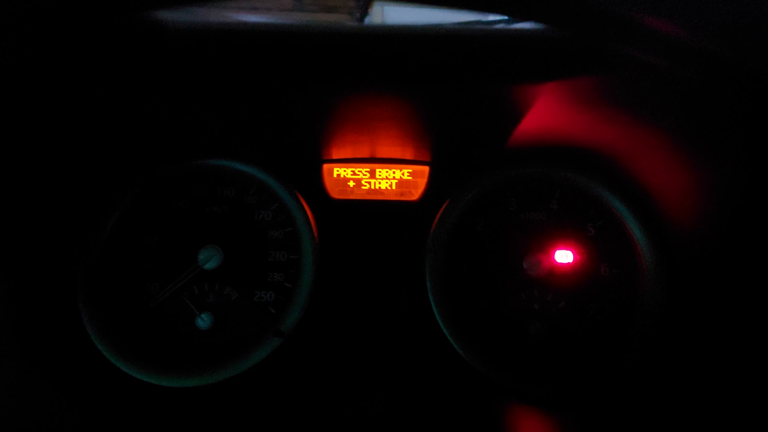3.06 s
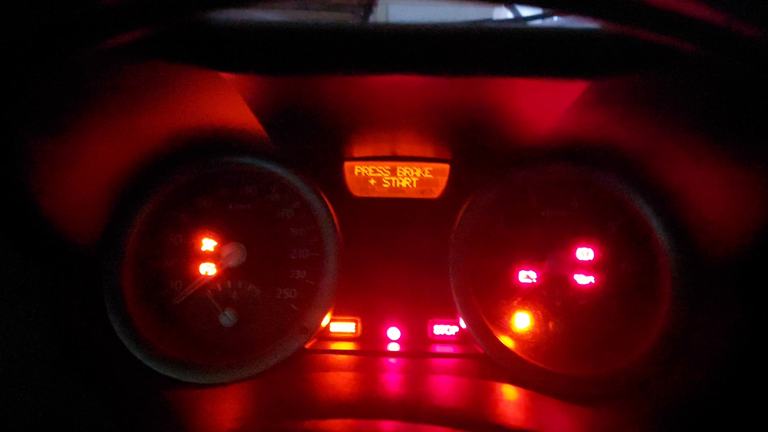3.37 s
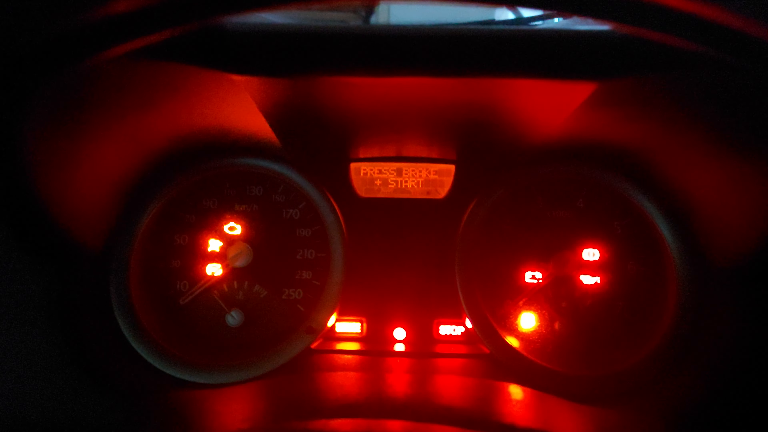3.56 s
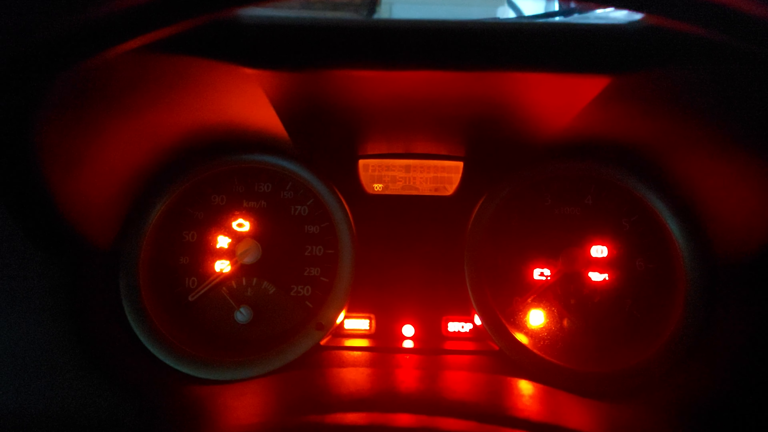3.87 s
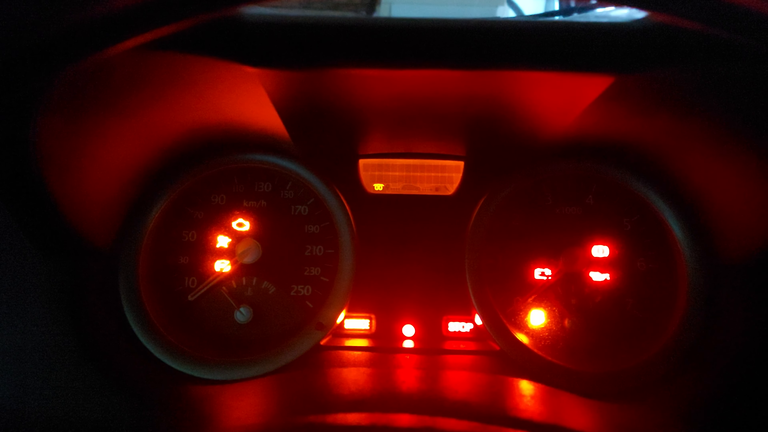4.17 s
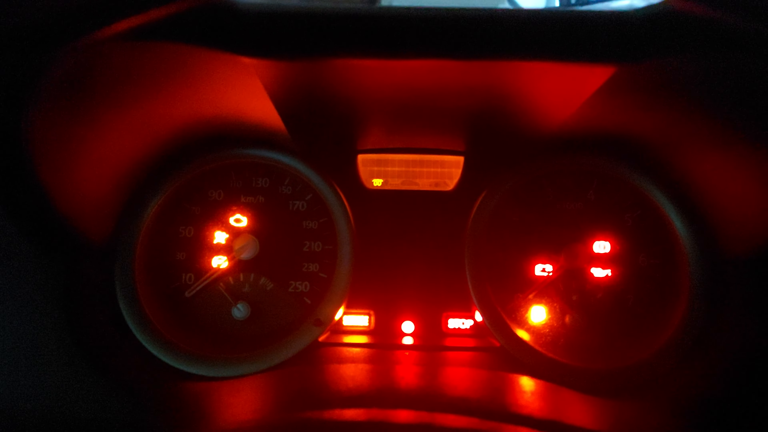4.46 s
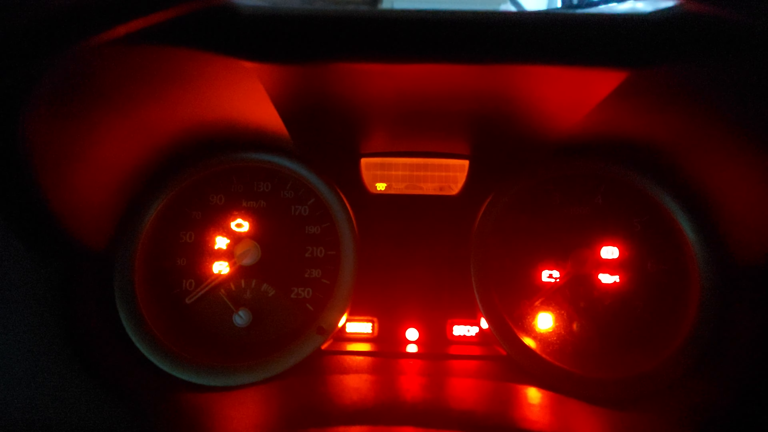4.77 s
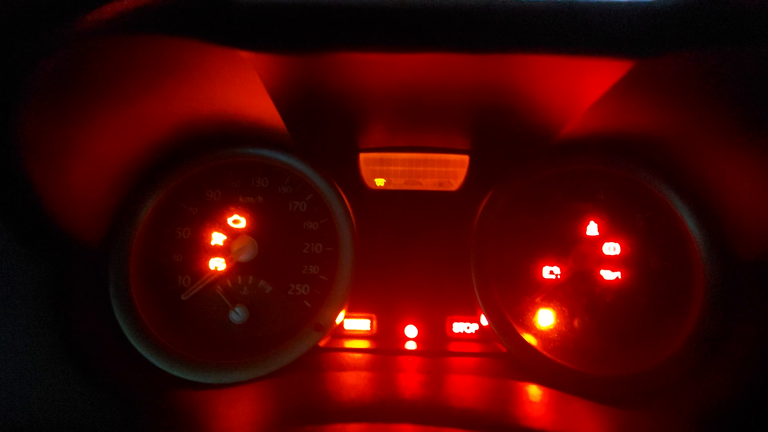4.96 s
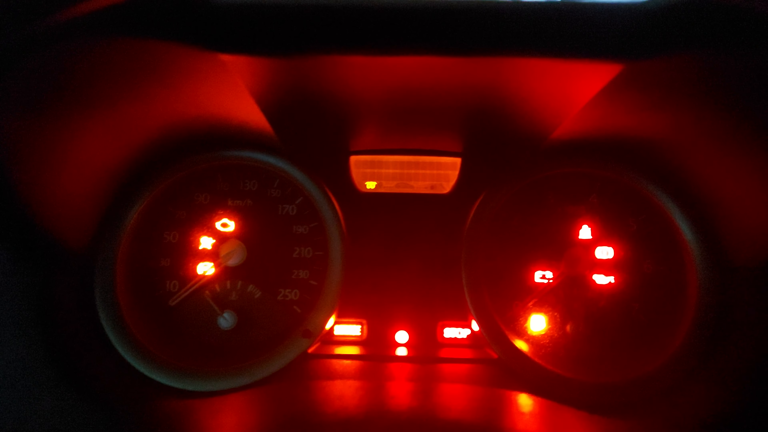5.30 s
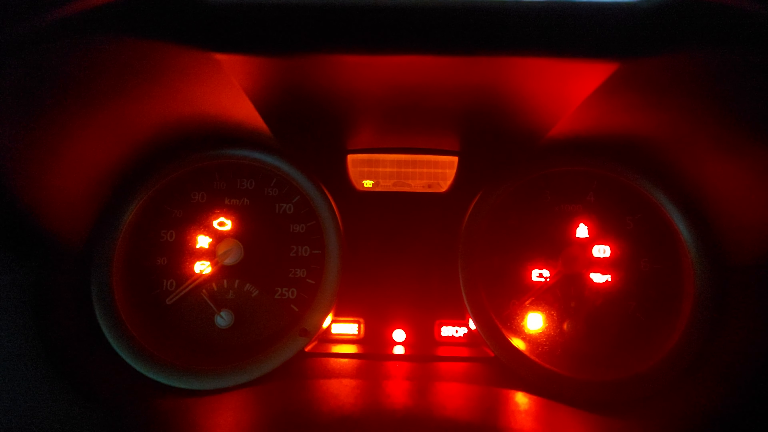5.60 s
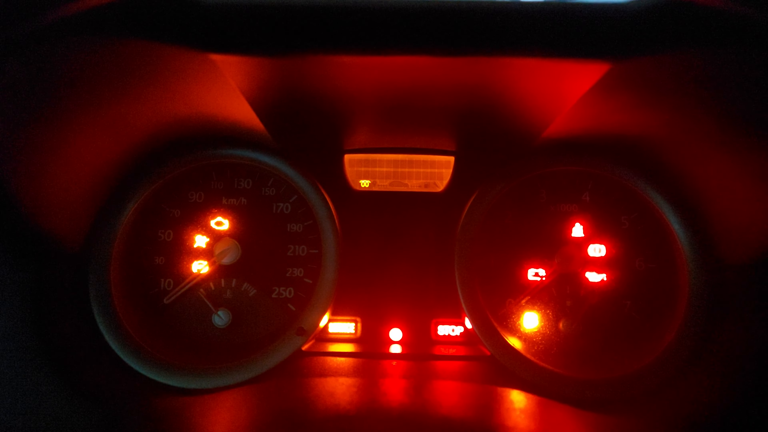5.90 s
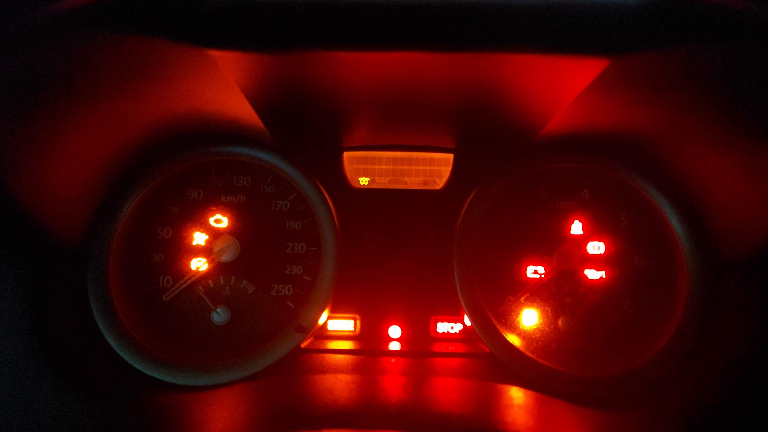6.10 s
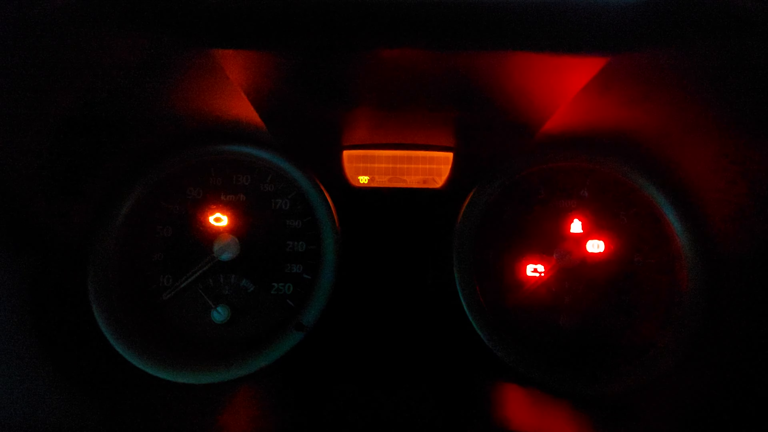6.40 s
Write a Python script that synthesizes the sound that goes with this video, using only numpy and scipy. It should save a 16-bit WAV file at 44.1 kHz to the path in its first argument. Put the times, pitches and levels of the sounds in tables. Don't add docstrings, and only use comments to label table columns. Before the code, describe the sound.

For the first second a driver shifts, with rustling fabric, cushion rumble and little creaks. A strong dull pedal blow follows, then sparse trim clicks. Just after three seconds a stiff button squeaks and snaps, the sharpest sound. Relays click, a faint pump starts, gauges tick finely, and low exhaust passes outside. Heard close up inside a closed, quiet car with light microphone hiss.

```python
import sys
import numpy as np
from scipy import signal
from scipy.fft import irfft, next_fast_len
from scipy.io import wavfile
from scipy.ndimage import uniform_filter1d

SR = 44100
rng = np.random.default_rng(int(sys.argv[2]) if len(sys.argv) > 2 else 0)


def master(y):
    cut = np.clip(np.atleast_2d(y).T, -1, 1)
    pcm = np.round(cut * 32767)
    wavfile.write(sys.argv[1], SR, pcm.astype(np.int16))


def voltage_ratio(level):
    return 10 ** (np.asarray(level, float) / 20)


N = 288414
T = np.arange(N) / SR

# (t/s,
# held/s, fibre hiss level/dB, rubbing level/dB, left-right/dB)
CLOTH_STROKES = [(0.031, 0.048, -59.5, -58.5, 7.5), (0.272, 0.088, -51.5, -55.5, 5.5),
                 (0.397, .15, -56.5, -54.5, 3.5), (0.575, 0.012, -59.5, -49, 6), (.62, 0.15, -67, -57, 6.5),
                 (0.772, 0.047, -64.5, -52.5, 5.5), (1.11, .005, -63.5, -71, 0),
                 (2.677, 0.042, -67.5, -68.5, -1), (2.76, 0.029, -85, -81, 6),
                 (3.21, 0.0022, -63.5, -48.5, -5), (3.27, 0.0061, -65, -60, -12.5),
                 (3.345, 0.0049, -72.5, -58.5, 16), (3.408, 0.15, -63.5, -61.5, -2),
                 (3.618, 0.097, -85, -73.5, 6.5), (3.925, 0.056, -89.5, -70, 6.5)]
CLOTH_RISE_S, CLOTH_FALL_S = 0.24, 0.13
# (f/Hz, level/dB per Hz)
GEAR_SPECTRUM = [(3300, -10.5), (4300, -1), (5800, -14), (7200, -2.5), (9500, -8), (11500, -0.5),
                 (13500, -9.5), (14500, -20.5)]
PEDAL_S = 1.5


def rms_one(x):
    return x / np.sqrt(np.mean(x ** 2) + 1e-20)


def peak_one(x):
    return x / np.max(np.abs(x))


def in_time(rows):
    s, *columns = np.transpose(rows)
    return [np.interp(T, s, c) for c in columns]


def at_hz(points, hz):
    f, level = np.transpose(points)
    return np.interp(np.log(hz), np.log(f), level)


def drift(rate):
    r = np.exp(-80 * np.pi * rate / SR)
    slow = signal.lfilter([1], [1, -2 * r, r * r], rng.standard_normal(N // 40 + 2002))[2000:]
    return np.interp(np.arange(N) / 40, np.arange(len(slow)), rms_one(slow))


def sides(db):
    return voltage_ratio(np.clip(np.array([db / 2, -db / 2]), -15, 15)).reshape(2, -1)


def coloured(spectrum, alike=None):
    # (f/Hz, left-right likeness)
    likeness = [(60, -0.51), (180, 0.77), (550, 0.33), (1650, -0.044), (4970, -0.85), (15000, -0.03)]
    size = next_fast_len(N)
    hz = np.maximum(np.fft.rfftfreq(size, 1 / SR), 1)
    c = np.clip(at_hz(likeness, hz) if alike is None else alike, 0, 1)
    phase = np.exp(2j * np.pi * rng.random((2, len(hz))))
    mid, side = rng.standard_normal((2, len(hz))) * phase
    both = np.sqrt(1 + c) * mid + np.sqrt(1 - c) * side * [[1], [-1]]
    inside = (hz >= spectrum[0][0]) & (hz <= spectrum[-1][0])
    return rms_one(irfft(both * voltage_ratio(at_hz(spectrum, hz)) * inside, size)[:, :N])


def band(x, low_hz, high_hz, order=2):
    return signal.sosfilt(signal.butter(order, [low_hz, high_hz], "band", fs=SR, output="sos"), x)


def resonate(x, hz, width_hz):
    r = np.exp(-np.pi * width_hz / SR)
    g = (1 - r * r) / 2
    return signal.lfilter([g, 0, -g], [1, -2 * r * np.cos(2 * np.pi * hz / SR), r * r], x)


def add(out, s, piece):
    i = round(s * SR)
    out[:, i:i + piece.shape[-1]] += piece[..., :N - i]


def packet(hz, swell_s):
    t = T[:SR // 20]
    return peak_one((t / swell_s) ** 2 * np.exp(-t / swell_s) * np.sin(2 * np.pi * hz * t))


def left_late(x):
    return np.array([np.roll(x[0], 21), x[1]])


def strokes(rows, column, rise_s, fall_s):
    s, held, db = (np.array(rows)[:, [c]] for c in (0, 1, column))
    t = T[::44]
    before, after = np.maximum(s - t, 0), np.maximum(t - s - held, 0)
    each = db - 60 * (before / rise_s + after / fall_s)
    total_db = 10 * np.log10(np.sum(10 ** (each / 10), axis=0) + 1e-14)
    return np.interp(T, t, total_db), np.repeat(each.argmax(axis=0), 44)[:N]


def struck(t):
    direct = 0.7 * np.exp(-t / .002)
    held = np.exp(-(t / 0.019) ** 2)
    tail = 0.046 * voltage_ratio(-60 * t / 0.13)
    return np.minimum(t / 0.0006, 1) * (direct + held + tail)


def half_shared(t):
    return rng.standard_normal(len(t)) + .5 * rng.standard_normal((2, len(t)))


def panel(t):
    # (f/Hz, width/Hz, level/dB)
    modes = [(1720, 200, 0.5), (2117, 570, -1)]
    shake = half_shared(t)
    ring = sum(voltage_ratio(db) * resonate(shake, hz, width_hz) for hz, width_hz, db in modes)
    return peak_one(band(ring, 1190, 2216, order=4) * struck(t))


def narrowed(snap, s, order):
    # (t/s, low f/Hz, high f/Hz)
    narrow = [(1.369, 2100, 8900), (2.098, 4800, 15500), (4.564, 6100, 14200), (3.892, 3000, 7400),
              (5.689, 7700, 15000)]
    for at, low_hz, high_hz in narrow:
        if abs(at - s) < 1 / 100:
            snap = band(snap, low_hz, high_hz, order=order)
    return snap


def friction(hiss, rows):
    spectrum = [(600, -27), (1000, -13.5), (1900, -7.5), (2500, -16.0), (3500, -21.0)]
    body, grain, out = coloured(spectrum, alike=0.038), voltage_ratio(1.1 * drift(98)), np.zeros((2, N))
    for s, length, body_db, hiss_db, pan_db in rows:
        at = slice(round(s * SR), round((s + length + 0.18) * SR))
        t = T[at] - s
        stroke = np.minimum(t / 0.0075, 1) * voltage_ratio(-60 * np.maximum(t - length, 0) / 0.066) * grain[at]
        out[:, at] += stroke * (voltage_ratio(body_db) * body[:, at] + voltage_ratio(hiss_db) * hiss[:, at]) * sides(pan_db)
    return out


def seat():
    # (t/s, held/s, cushion level/dB, creak level/dB)
    shifts = [(0, 0.17, -53.5, -63), (.24, 0.13, -40, -51.5), (.45, 0.039, -37.5, -47),
              (.52, 0.1, -40, -48.5), (.74, 0.08, -35.5, -43.5), (.94, 0.0039, -55, -63.5),
              (1.02, .13, -40, -56.5), (1.75, 0.016, -38.5, -52), (3.42, 0.08, -73, -62),
              (3.64, .08, -63, -63)]
    # (t/s, held/s, cushion level/dB, creak level/dB)
    jolts = [(1.6, 0.0042, -24.5, -40.5), (1.646, 0.033, -36.5, -53.5), (2.325, 0.003, -58, -44.5),
             (2.44, .02, -62, -57.5), (2.665, 0.023, -62, -55.5), (2.995, .005, -37, -41.5),
             (3.055, .005, -39, -63), (3.213, .003, -40, -41.5), (3.26, 0.024, -62, -46),
             (3.58, 0.0054, -64.5, -55)]
    creak_haste = 1.6
    kinds = [(shifts, 0.22, 0.39), (jolts, 0.037, 0.25)]
    cushion_db = np.maximum(*[strokes(rows, 2, rise, fall)[0] for rows, rise, fall in kinds])
    creak_db = np.maximum(*[strokes(rows, 3, rise, fall / creak_haste)[0] for rows, rise, fall in kinds])
    foam = coloured([(55, -11.5), (90, 3.0), (140, -2.0), (220, -7.5)], alike=0.8)
    frame = coloured([(190, -3.5), (300, 2.5), (600, -4.0), (800, -13.0), (1400, -33.5)], alike=.6)
    out = voltage_ratio(cushion_db - 6.0 + 1.7 * drift(8.1)) * foam * sides(0.92)
    return out + voltage_ratio(creak_db - 3.5 + 1.5 * drift(37)) * frame * sides(2.86)


def still_cabin():
    # (t/s, level above rest/dB)
    stir = [(0, 15), (.29, 19), (.42, 21), (.75, 12.5), (1.2, 1.5), (1.69, 7.5), (2.0, 4.5), (2.48, 8),
            (3.11, 3), (3.19, -1), (3.33, 14), (3.42, 23.5), (3.68, 6.5), (3.92, 1.5), (4.04, 8),
            (4.19, 0.5), (4.75, 4.5), (6.0, -2)]
    # (f/Hz, level/dB per Hz)
    hiss_spectrum = [(1470, -45.5), (2500, -16), (3380, -9), (6300, -10.5), (7900, -0.5), (9200, -10),
                     (11500, -4), (16000, -4.5)]
    # (f/Hz, level/dB per Hz)
    murmur_spectrum = [(800, -3), (1000, -2.5), (1500, -1), (2150, -3.5), (2500, -7.5), (3400, -20.5)]
    stir_db, = in_time(stir)
    hiss = voltage_ratio(-81.5 + stir_db + 1.6 * drift(4.6)) * coloured(hiss_spectrum, alike=0)
    murmur = voltage_ratio(-88.5 + 1.2 * stir_db) * coloured(murmur_spectrum)
    return hiss * sides(0.82) + murmur * sides(1.4)


def machine_hum():
    # (multiple of the shaft rate, level/dB)
    orders = [(1, -0.5), (2, -1.5), (3, -0.5), (3.5, -16), (4, -11.5), (5, -26), (9, -11.5), (10, -19.5),
              (12, -28.5)]
    shaft_hz, load_s = 32.82, 4.49
    turn = 2 * np.pi * shaft_hz * T
    db = -59 + 2.5 * np.clip((T - load_s) / 0.14, 0, 1)
    tones = sum(voltage_ratio(level + .4 * k * drift(9)) * np.sin(k * turn + rng.uniform(0, 2 * np.pi))
                for k, level in orders)
    return np.sqrt(2) * voltage_ratio(db) * tones * sides(2.1)


def passing_vehicle():
    # (t/s, firing f/Hz, tone level/dB)
    engine = [(0, 54.96, -66.5), (1.9, 55.56, -65), (4.3, 54.48, -59), (4.75, 54.07, -49),
              (5.04, 53.87, -49.5), (5.13, 53.5, -53.5), (5.2, 53.6, -50.5), (5.29, 53.52, -56.5),
              (5.37, 53.26, -49), (5.45, 53.68, -46.5), (5.7, 53.26, -48.5), (5.95, 52.2, -54.5),
              (6.12, 50.2, -61), (6.3, 50.87, -51.5), (6.54, 50.57, -48.5)]
    # (f/Hz, level/dB per Hz)
    rumble_spectrum = [(40, -5), (70, 4), (150, -8.5), (200, -15), (290, -13), (400, -24.5), (600, -25),
                       (900, -41.5)]
    nearest_s, approach_s, retreat_s, far_db, near_db = 5.7, 0.55, 0.59, -75, -66
    hz, tone_db = in_time(engine)
    nearness = 1 / (1 + ((T - nearest_s) / np.where(T < nearest_s, approach_s, retreat_s)) ** 2)
    rumble_db = far_db + (near_db - far_db) * nearness
    turn = 2 * np.pi * np.cumsum(hz) / SR
    tones = sum(voltage_ratio(db + wobble_db * drift(3.2)) * np.sin(k * turn - [[0], [.5]])
                for k, db, wobble_db in [(1, 3.0, 1.9), (2, -14.5, 1.7), (3, -21.0, 2.2)])
    rumble = voltage_ratio(rumble_db + 14.0 + 2 * drift(29.0)) * coloured(rumble_spectrum)
    return np.sqrt(2) * voltage_ratio(tone_db) * tones + rumble


def cloth():
    # (f/Hz, level/dB per Hz)
    fibre_spectrum = [(1410, -29), (2400, 1), (2950, -2), (3770, -1), (7830, -6.5), (9030, -11),
                      (11600, -5.5), (16000, -13)]
    fibre_db, loudest = strokes(CLOTH_STROKES, 2, CLOTH_RISE_S, CLOTH_FALL_S)
    rub_db, _ = strokes(CLOTH_STROKES, 3, CLOTH_RISE_S, CLOTH_FALL_S)
    pan_db = uniform_filter1d(np.array(CLOTH_STROKES)[loudest, -1], size=441)
    rub_spectrum = [(500, -3), (900, -2.0), (1500, 1.0), (2200, -1.0), (2800, -17), (4500, -17.5)]
    rub = voltage_ratio(rub_db - 3.5 + 1.8 * drift(140)) * coloured(rub_spectrum, alike=0.066)
    hiss = voltage_ratio(fibre_db - 2 + 1.5 * drift(25)) * coloured(fibre_spectrum, alike=0.04)
    return (hiss + rub) * sides(pan_db)


def crackle():
    snaps_per_s = 900
    rub_db, _ = strokes(CLOTH_STROKES, 3, CLOTH_RISE_S, CLOTH_FALL_S)
    sizes = voltage_ratio(3.1 * np.minimum(rng.exponential(1, N), 3)) * rng.choice([-1, 1], N)
    snaps = band(sizes * (rng.random(N) < snaps_per_s / SR) + 1e-18, 1200, 2380)
    return voltage_ratio(rub_db - 9) * rms_one(snaps) * (T < PEDAL_S) * sides(3.1)


def thumps():
    # (t/s, peak level/dB, f/Hz, length/s, crunch level/dB)
    blows = [(0.208, -30, 118, 0.023, -34), (0.24, -25, 92, 0.042, -32), (0.4405, -28, 125, 0.029, -23),
             (0.757, -31, 127, 0.036, 2), (0.801, -26.5, 98, 0.039, -6.5), (0.921, -42, 305, 0.035, -8),
             (1.004, -31.5, 115.5, 0.067, -7), (1.086, -29, 112, 0.035, -6.5),
             (1.138, -30.5, 91, 0.06, -42), (1.5655, -9, 130, 0.039, -19), (1.7358, -21, 130.7, 0.056, -24),
             (1.573, -26.5, 511, 0.017, -18), (1.6066, -21, 110, 0.024, -22),
             (1.637, -25, 108, 0.031, -14.5)]
    out, t = np.zeros((2, N)), T[:SR // 3]
    for s, db, hz, length, crunch_db in blows:
        skew = 0.68 if s < PEDAL_S else 1
        swell = np.sin(np.pi * np.minimum(t / length, 1) ** skew) ** 2
        push = peak_one(-swell * np.sin(2 * np.pi * hz * t))
        crunch = peak_one(band(rng.standard_normal(len(t)), 270, 438) * swell)
        add(out, s, sides(1.0) * voltage_ratio(db - 5.5) * (push + voltage_ratio(crunch_db) * crunch))
    return out


def creaks():
    # (t/s, peak level/dB)
    slips = [(0.282, -55), (0.321, -45), (0.401, -51), (0.479, -45), (0.525, -44), (0.53, -44),
             (0.545, -47), (0.555, -44), (0.566, -41), (0.583, -42), (0.597, -44), (0.605, -46),
             (0.624, -49), (0.687, -48), (0.745, -51), (0.807, -38), (1.735, -55)]
    out = np.zeros((2, N))
    for s, db in slips:
        hz = 625 * (1 + 0.079 * rng.uniform(-0.57, 1))
        add(out, s, voltage_ratio(db - 3.0) * packet(hz, 0.0017) * sides(7.2))
    return out


def cracks():
    # (t/s, peak level/dB, low f/Hz, high f/Hz, t60/s)
    bursts = [(0.544, -60, 1500, 5000, .05), (.686, -51, 1200, 5000, .06),
              (0.771, -51.5, 1200, 5000, 0.067), (1.091, -48, 900, 6000, 0.053),
              (1.572, -54, 800, 3000, 0.24), (1.735, -61.5, 500, 1200, 0.084),
              (2.648, -43, 2200, 7000, 0.054), (2.989, -35, 2280, 4550, 0.079),
              (3.178, -19, 5200, 7500, 0.038), (5.689, -60, 2500, 11960, 0.029)]
    out, t = np.zeros((2, N)), T[:SR // 5]
    for s, db, low_hz, high_hz, t60 in bursts:
        shake = rng.standard_normal(len(t)) + .6 * rng.standard_normal((2, len(t)))
        add(out, s, voltage_ratio(db) * peak_one(band(shake * voltage_ratio(-60 * t / t60), low_hz, high_hz)) * sides(4.5))
    return out


def sparks():
    # (t/s, peak level/dB, f/Hz, width/Hz, left-right/dB)
    snaps = [
        (0.5735, -34.5, 1600, 1500, 9),
        (1.8113, -31.5, 6890, 8160, 25),
    ]
    out = np.zeros((2, N))
    impulse = 1. * (T[:SR // 20] == 0)
    for s, db, hz, width_hz, pan_db in snaps:
        add(out, s, voltage_ratio(db) * peak_one(resonate(impulse, hz, width_hz)) * sides(pan_db))
    return left_late(out)


def clicks():
    # (t/s, body peak level/dB, panel level/dB, snap level/dB, left-right/dB)
    trim = [(0.745, -39.5, -61, -62.5, 7), (0.805, -60, -57, -64, 6), (0.906, -75, -85, -60, -7),
            (1.003, -62, -61, -62, -5), (1.045, -49, -41.5, -44, -5), (1.09, -50.5, -51, -48, -7.5),
            (1.368, -63.5, -60, -49.5, -3), (1.572, -42, -53, -65.5, 12.5), (2.097, -64, -60.5, -56, -5.5),
            (2.284, -70, -83, -69, -8), (2.311, -51.5, -66, -69, 16), (2.454, -61, -60, -69, 5),
            (2.649, -46, -39, -51, 3.5), (2.976, -41.5, -56, -53, -11), (2.989, -31, -30, -40, 3),
            (3.257, -40, -36, -51, 14.5), (3.33, -39.5, -46.5, -50, 5.5), (3.868, -57, -61, -75, 8),
            (4.564, -41.5, -39.5, -39, 2.5)]
    # (t/s, body peak level/dB, panel level/dB, snap level/dB, left-right/dB)
    relays = [
        (3.577, -42.5, -46, -59.5, 11),
        (3.892, -50.5, -43, -75, 15),
        (4.606, -31, -40.5, -47.5, 7),
    ]
    # (f/Hz, level/dB per Hz)
    snap_spectrum = [(1500, -6), (3000, -3), (4800, -2.5), (6000, -2.5), (8000, 2.5), (9500, -6),
                     (12000, 0), (16000, -8)]
    low, out, t, bright = np.zeros((2, N)), np.zeros((2, N)), T[:SR // 4], coloured(snap_spectrum, alike=0.22)
    trim_hz = 594.5 + 50 * rng.uniform(-0.67, 1, len(trim))
    struck_parts = [(hz, 0.41, *row) for hz, row in zip(trim_hz, trim)] + [(824, 0.4, *row) for row in relays]
    for hz, knock, s, db, panel_db, snap_db, pan_db in struck_parts:
        body = np.sin(2 * np.pi * hz * t) + knock * rms_one(band(half_shared(t), 450, 1455))
        snap = bright[:, round(s * SR):][:, :len(t)] * struck(t) ** 1.72
        snap = peak_one(narrowed(snap, s, order=3))
        add(low, s, voltage_ratio(db) * peak_one(body * struck(t) ** 0.81) * sides(0.41 * pan_db))
        add(out, s, (voltage_ratio(panel_db - 2) * panel(t) + voltage_ratio(snap_db + 9.0) * snap) * sides(pan_db))
    return low + left_late(out)


def drags():
    # (t/s, length/s, body level/dB, hiss level/dB, left-right/dB)
    rows = [(1.041, 0.061, -63.5, -65.5, 11), (1.678, 0.027, -83, -65.5, -6), (2.045, 0.035, -81, -70, -2),
            (3.006, 0.096, -72.5, -69, -2), (4.038, 0.036, -71.5, -68.5, -2),
            (4.077, 0.09, -62, -65.5, 0.5)]
    # (f/Hz, level/dB per Hz)
    trim_spectrum = [(2730, -43), (3460, -2.5), (4250, -0.5), (6120, -1.5), (7710, 4.5), (9780, -8),
                     (11000, 0.5), (16000, -1)]
    return friction(coloured(trim_spectrum, alike=0.07), rows)


def pings():
    # (t/s, f/Hz, peak level/dB, t60/s)
    rings = [(1.369, 5150, -40.5, 0.0098), (1.577, 4260, -59.5, 0.052), (2.65, 5340, -47, 0.04),
             (2.975, 5770, -40.5, 0.028), (2.976, 1137, -39, 0.11), (3.199, 1754, -47, 0.22),
             (3.2, 1428, -45, .15), (3.335, 702, -48, 0.19), (3.254, 1170, -36.5, 0.063),
             (3.256, 800, -38, 0.11), (3.256, 2290, -49, 0.035), (4.566, 1260, -48.5, 0.21),
             (4.565, 2720, -52.5, 0.076), (3.332, 5800, -55, 0.044), (3.577, 7620, -52, 0.048),
             (3.868, 1910, -63.5, 0.16), (3.894, 2050, -48, 0.084), (3.894, 1955, -50.5, 0.085),
             (4.608, 202, -50.5, 0.32), (4.63, 1380, -61.5, 0.62)]
    out, t = np.zeros((2, N)), T[:SR // 2]
    for s, hz, db, t60 in rings:
        add(out, s, voltage_ratio(db - 60 * t / t60) * np.sin(2 * np.pi * hz * t) * sides(7.5))
    return left_late(out)


def knocks():
    # (t/s, peak level/dB, f/Hz, swell/s)
    notes_struck = [(1.677, -37, 116, 0.0036), (1.694, -42, 94, 0.0036), (2.315, -47, 330, 0.0033),
                    (3.133, -32.5, 580, 0.0011), (3.144, -32, 590, 0.0019), (3.152, -37, 540, 0.0019),
                    (3.1585, -20, 530, 0.0012), (3.165, -26, 490, 0.0018), (3.176, -31, 640, 0.0014),
                    (3.186, -29, 640, .002), (3.193, -36, 520, .002), (3.264, -46, 483, 0.0018),
                    (3.276, -44, 516, 0.0022), (3.265, -44, 2030, .001), (3.274, -55, 1980, .0012),
                    (3.487, -53, 652, 0.0034), (4.581, -45.5, 607, 0.0029), (4.609, -49, 293, 0.0036)]
    out = np.zeros((2, N))
    for s, db, hz, swell_s in notes_struck:
        add(out, s, voltage_ratio(db) * packet(hz, swell_s) * sides(2.8))
    return out


def button():
    # (t/s, grip as squeak level/dB)
    press = [(3.126, -53), (3.135, -30.5), (3.147, -28), (3.166, -20), (3.175, -27), (3.179, -16),
             (3.187, -27), (3.211, -48.5), (3.25, -65.5)]
    # (t/s, peak level/dB, f/Hz)
    slips = [(3.1331, -23, 1880), (3.141, -27.5, 1800), (3.147, -17, 1970), (3.15, -19, 1970),
             (3.1565, -10, 1970), (3.1625, -19, 1950), (3.1684, -11, 1960), (3.1775, -13.5, 2260),
             (3.1787, -13, 1740), (3.1792, -14.5, 1450)]
    # (f/Hz, width/Hz, level/dB)
    sleeve = [(1924, 190, -3), (1480, 500, -5.5), (1187, 400, -3.5)]
    # (f/Hz, level/dB per Hz)
    rattle_spectrum = [(1470, -32), (2500, -8.5), (3380, -4), (4340, -2), (5070, -9), (9580, -13),
                       (10400, -8), (16000, -19.5)]
    latch_s, grows_db_per_s, fades_db_per_s = 3.177, 479, 250
    grip_db = np.interp(T, *np.transpose(press), left=-150, right=-150)
    loose_db = -np.where(T < latch_s, grows_db_per_s, fades_db_per_s) * np.abs(T - latch_s)
    squeak, rattle = voltage_ratio(grip_db), voltage_ratio(grip_db + loose_db)
    knock = voltage_ratio(-33.5 + 0.86 * (grip_db + 26.5))
    kicks = np.zeros((1, N))
    for s, db, hz in slips:
        add(kicks, s, voltage_ratio(db) * packet(hz, .0006))
    rough = rng.standard_normal((2, N))
    shaken = voltage_ratio(13) * squeak * rough[0] + 1e-18
    near = kicks + sum(voltage_ratio(db) * resonate(resonate(shaken, hz, w), hz, 3 * w) for hz, w, db in sleeve)
    far = voltage_ratio(5.0) * band(squeak * rough[1], 900, 1700)
    bright = rattle * voltage_ratio(1.0 + 2 * drift(180)) * coloured(rattle_spectrum, alike=0.13) * sides(5.0)
    dull = knock * coloured([(250, -6.0), (350, -4.5), (550, -1.0), (900, -3.0)], alike=0.53) * sides(15.0)
    return left_late(near * sides(12) + far * [[.3], [1]] + bright) + dull


def latch():
    # (t/s, peak level/dB)
    hits = [
        (3.175, -24),
        (3.1768, -11.5),
        (3.1794, -9),
        (3.1812, -14),
        (3.185, -22.5),
    ]
    out, t = np.zeros((2, N)), T[:SR // 20]
    for s, db in hits:
        shake = rng.standard_normal(len(t))
        metal = resonate(shake, 4600, 700) + .7 * resonate(shake, 10500, 2500)
        add(out, s, voltage_ratio(db) * peak_one(metal * voltage_ratio(-60 * t / 0.045)) * sides(10.5) * [[1], [-1]])
    return out


def pump():
    # (f/Hz, level/dB per Hz)
    whirr_spectrum = [(170, -2), (220, -6), (300, 3), (400, 0), (520, 0), (800, -4.5), (950, -17.5),
                      (1800, -22)]
    # (f/Hz, width/Hz, level/dB)
    pan_modes = [(512, 43, -4.5), (623, 33, -13.5), (826, 40, -13.5)]
    on_s, spin_up_s, settle_s, start_db, run_db = 4.6, 0.044, 1, -63.5, -70
    since = np.maximum(T - on_s, 0)
    spin = np.minimum(since / spin_up_s, 1)
    gain = spin * voltage_ratio(run_db + (start_db - run_db) * np.exp(-since / settle_s))
    whirr = voltage_ratio(0.73 * drift(31) + drift(2.5)) * coloured(whirr_spectrum)
    whine = rms_one(resonate(resonate(rng.standard_normal((2, N)), 2100, 820), 2100, 600))
    shake, rings = rng.standard_normal((2, N)), 0
    for hz, width_hz, db in pan_modes:
        ring = rms_one(resonate(resonate(shake, hz, width_hz), hz, width_hz))
        rings = rings + voltage_ratio(db + run_db + since + 2.1 * drift(4)) * ring
    return gain * (whirr + voltage_ratio(-16.5) * whine) * sides(5.4) + spin * rings * sides(6.7)


def puff():
    start_s, length_s = 4.634, .064
    fall = voltage_ratio(-60 * np.maximum(T - start_s - length_s, 0) / .08)
    gate = np.clip((T - start_s) / .004, 0, 1) * fall
    spectrum = [(3000, -18), (5500, -7.5), (7600, 1.5), (9000, -6), (11500, -0.5), (16000, -6)]
    return voltage_ratio(-62.5) * gate * coloured(spectrum, alike=0.19) * sides(-27)


def gauge_ticks():
    # (t/s, panel peak level/dB, snap level/dB)
    ticks = [(4.85, -58, -56), (4.918, -77, -57), (4.952, -55, -49), (5.057, -52.5, -51.5),
             (5.2668, -61.5, -59.5), (5.5207, -56.5, -56), (5.54, -64, -72), (5.7557, -74.5, -71.5),
             (5.689, -66.5, -58.5), (5.8333, -76.5, -64)]
    out, t, plastic = np.zeros((2, N)), T[:SR // 4], coloured(GEAR_SPECTRUM, alike=0.25)
    for s, panel_db, snap_db in ticks:
        snap = plastic[:, round(s * SR):][:, :len(t)] * struck(t) ** 2.0
        snap = peak_one(narrowed(snap, s, order=1))
        ring = panel(t) * struck(t) ** 0.4
        add(out, s, (voltage_ratio(panel_db - 0.5) * ring + voltage_ratio(snap_db + 8.5) * snap) * sides(11.2))
    return left_late(out)


def gauge_gears():
    # (t/s, length/s, hiss level/dB)
    sweeps = [(4.925, 0.038, -65), (5.027, 0.044, -69), (5.131, 0.043, -71.5), (5.234, 0.05, -71),
              (5.341, 0.052, -70), (5.486, 0.083, -78)]
    hiss = coloured(GEAR_SPECTRUM, alike=0.22) * voltage_ratio(4.0 * drift(220))
    return friction(hiss, [(s, length, db - 2, db, 11) for s, length, db in sweeps])


def whine_swells():
    # (t/s, length/s, f/Hz, sag/Hz per s, peak level/dB)
    swells = [
        (5.1, 0.32, 106.9, 3.9, -50),
        (5.25, 0.36, 151.8, 5.6, -57),
        (5.62, 0.44, 155, 16, -53),
        (5.9, 0.38, 101.1, 3.7, -55.5),
    ]
    out = np.zeros((2, N))
    for s, length, hz, sag, db in swells:
        t = T[:round(length * SR)]
        tone = np.sin(2 * np.pi * (hz - sag * t / 2) * t)
        add(out, s, voltage_ratio(db) * np.sin(np.pi * t / length) * tone * sides(.8))
    return out * voltage_ratio(1.5 * drift(12))


def top_cut(x):
    return signal.sosfilt(signal.ellip(10, .5, 70, 15800, fs=SR, output="sos"), x)


def scene():
    outside = machine_hum() + passing_vehicle() * sides(0.87) + whine_swells()
    driver = seat() + cloth() + crackle() + thumps() + creaks() + cracks()
    plastic = clicks() + drags() + pings() + knocks() + button() + latch()
    car = still_cabin() + pump() + puff() + gauge_ticks() + gauge_gears()
    return top_cut(outside + driver + plastic + car) + sparks()


def band_limit(x):
    return signal.sosfilt(signal.butter(12, 16520, fs=SR, output="sos"), x)


def record(dry):
    hiss = voltage_ratio(-80) * rms_one(top_cut(band(rng.standard_normal(dry.shape), 10600, 14000, order=1)))
    whistle = voltage_ratio(-94 + 3.1 * drift(20)) * np.sin(2 * np.pi * 15628 * T)
    return band_limit(np.tanh(dry + hiss + whistle))


dry = scene()
out = record(dry)
master(out)
```